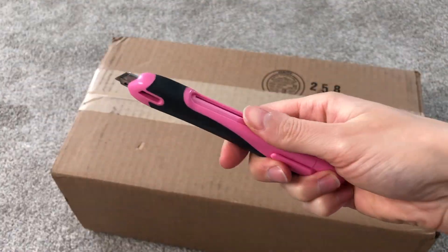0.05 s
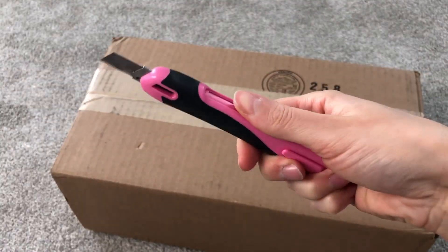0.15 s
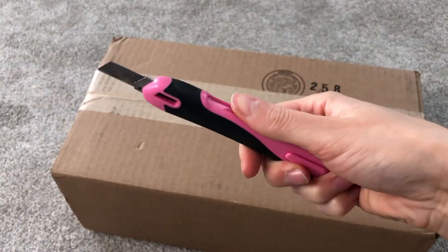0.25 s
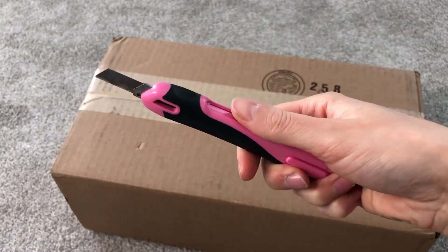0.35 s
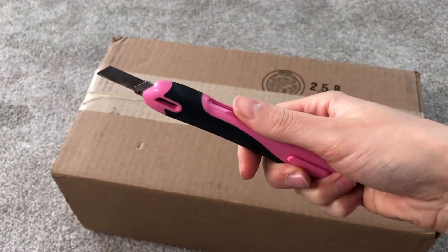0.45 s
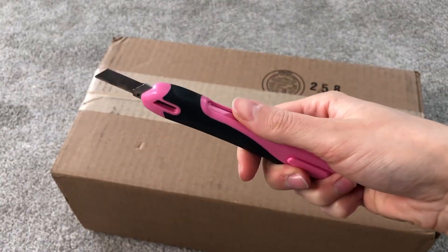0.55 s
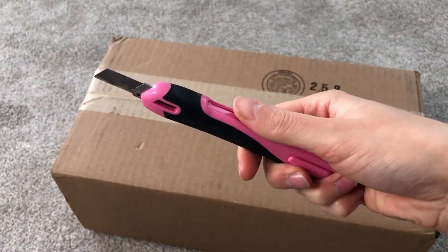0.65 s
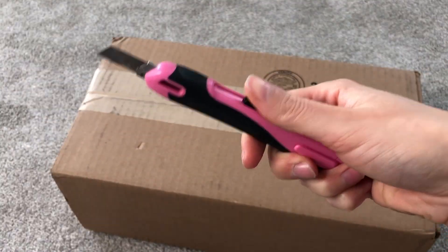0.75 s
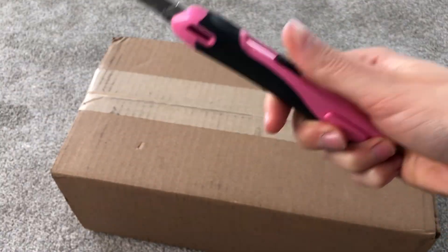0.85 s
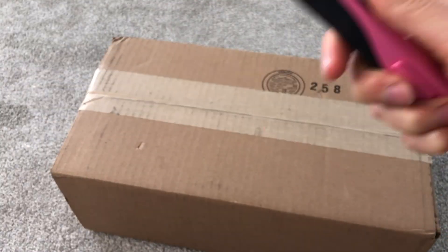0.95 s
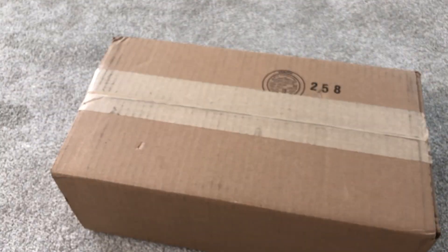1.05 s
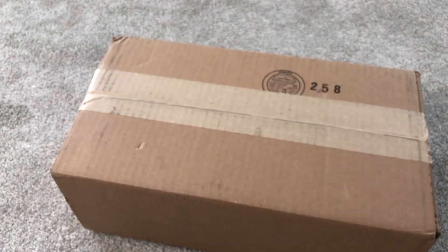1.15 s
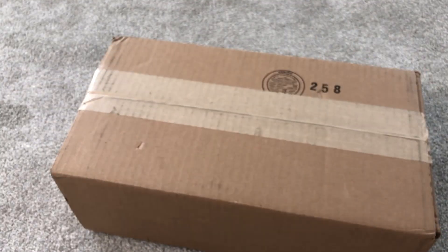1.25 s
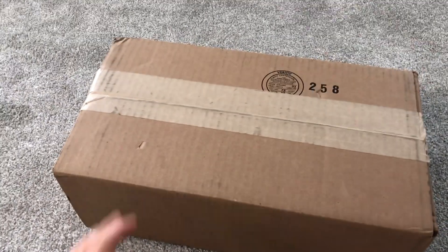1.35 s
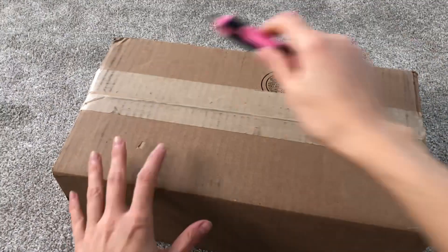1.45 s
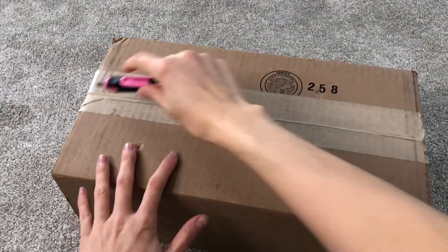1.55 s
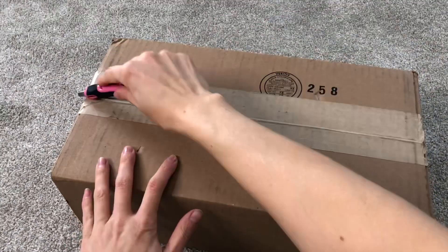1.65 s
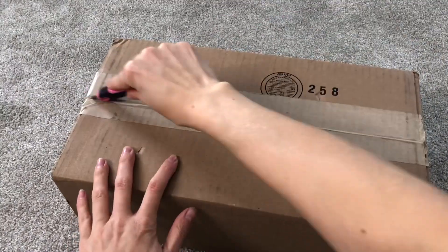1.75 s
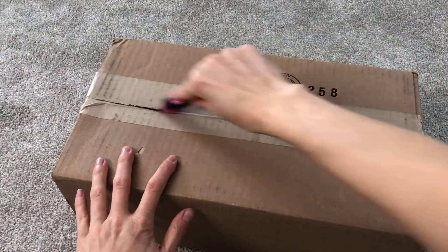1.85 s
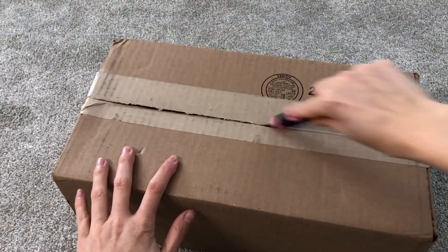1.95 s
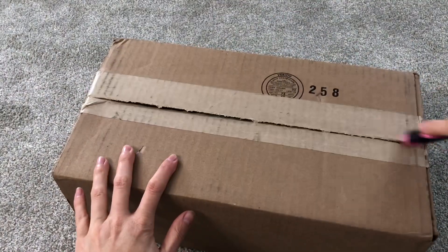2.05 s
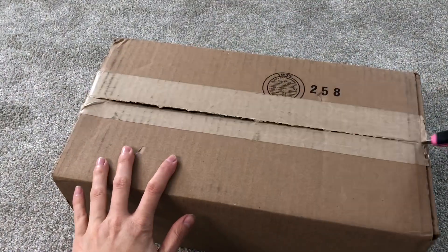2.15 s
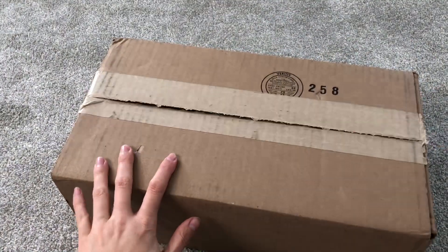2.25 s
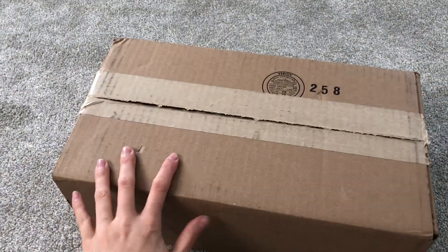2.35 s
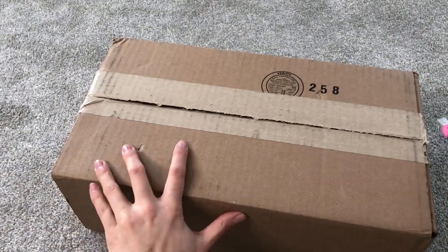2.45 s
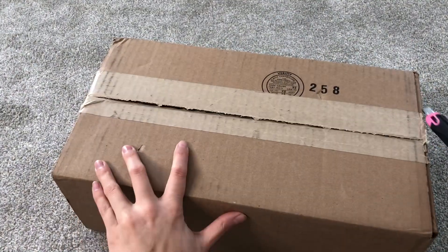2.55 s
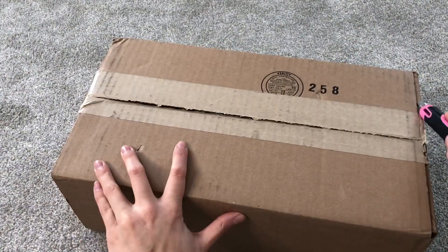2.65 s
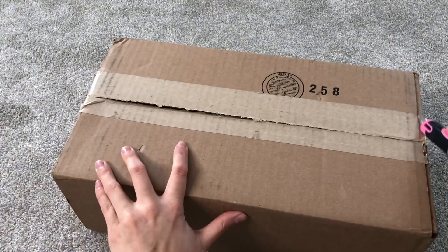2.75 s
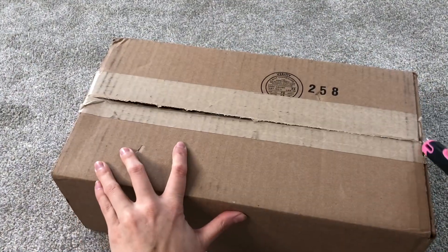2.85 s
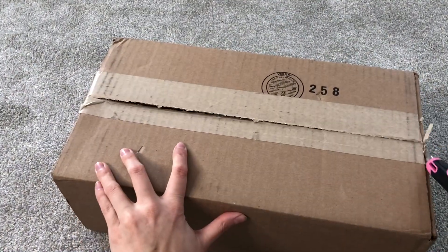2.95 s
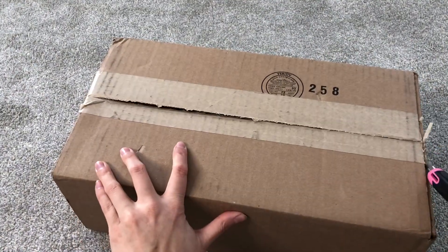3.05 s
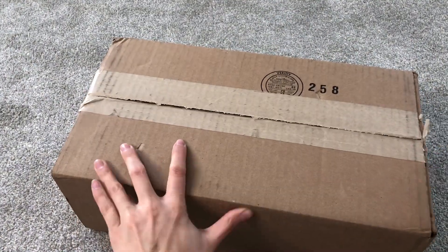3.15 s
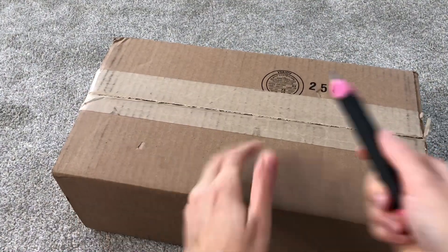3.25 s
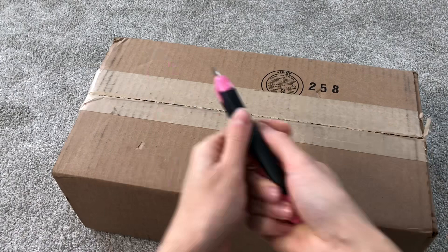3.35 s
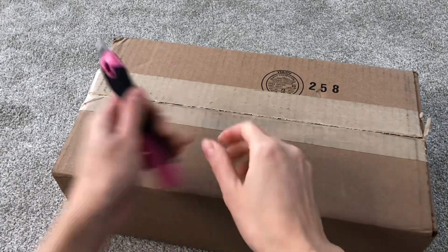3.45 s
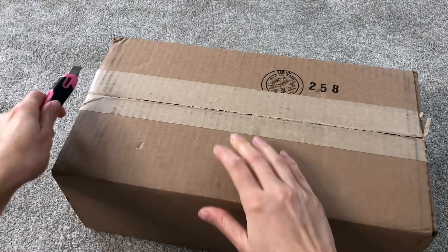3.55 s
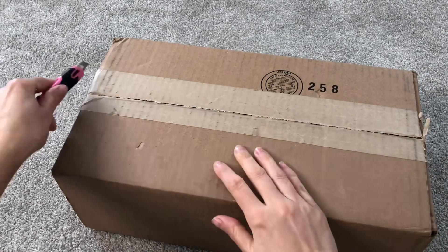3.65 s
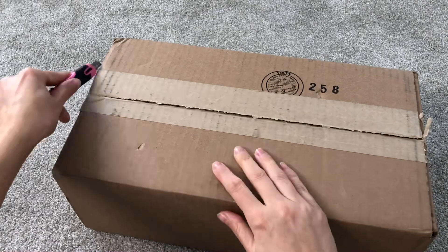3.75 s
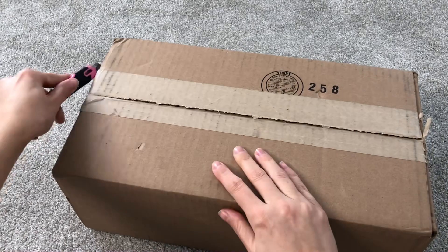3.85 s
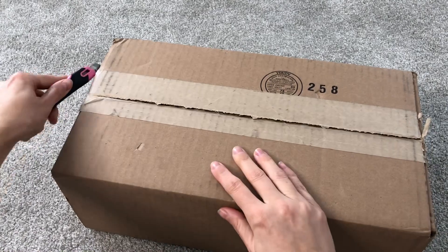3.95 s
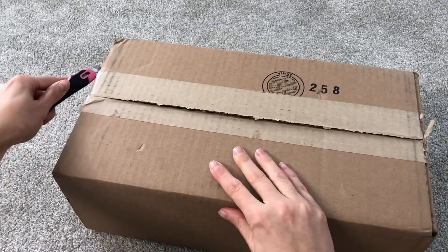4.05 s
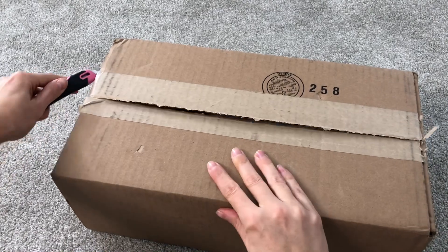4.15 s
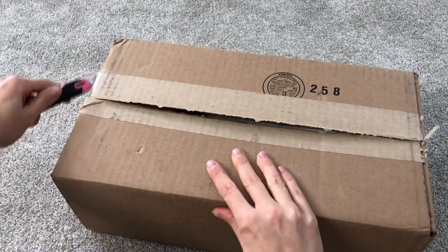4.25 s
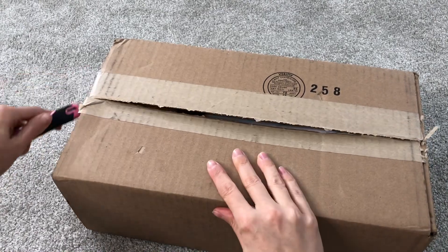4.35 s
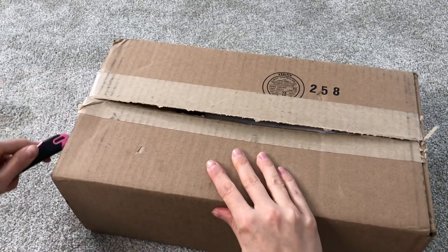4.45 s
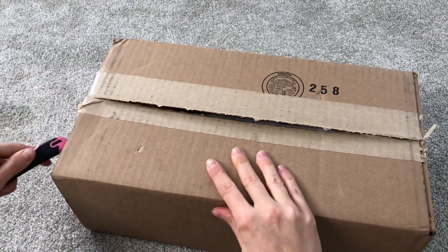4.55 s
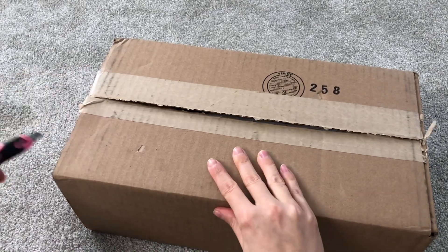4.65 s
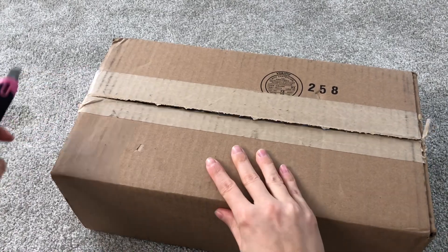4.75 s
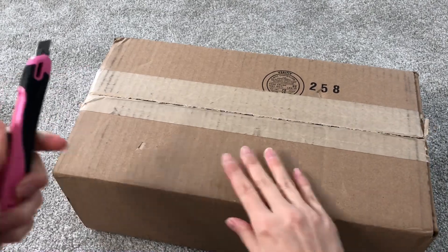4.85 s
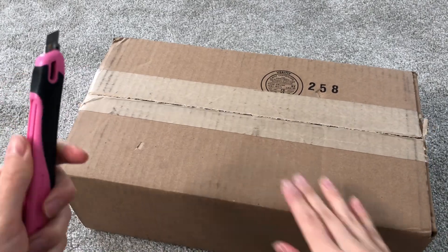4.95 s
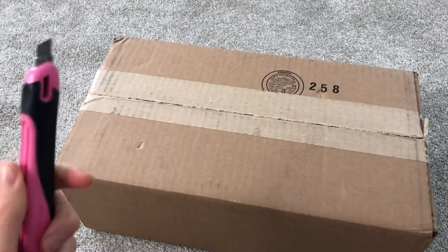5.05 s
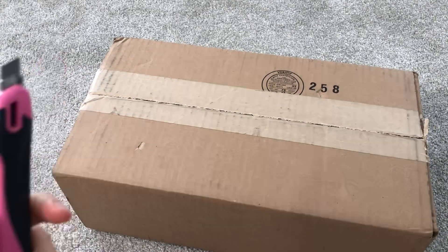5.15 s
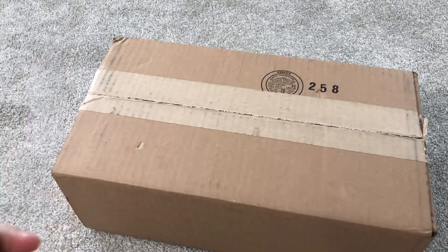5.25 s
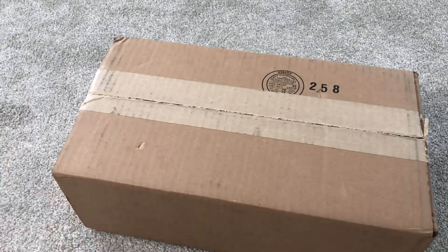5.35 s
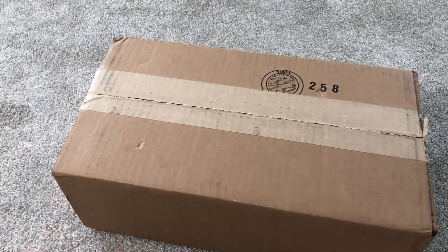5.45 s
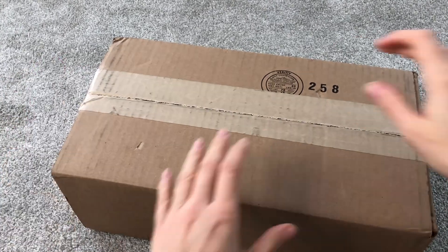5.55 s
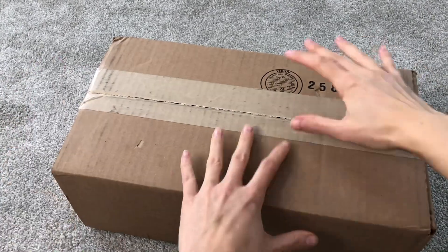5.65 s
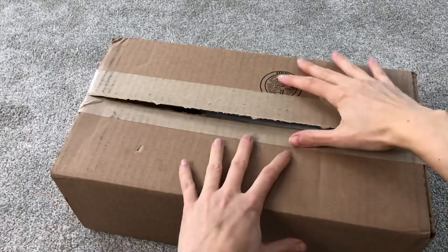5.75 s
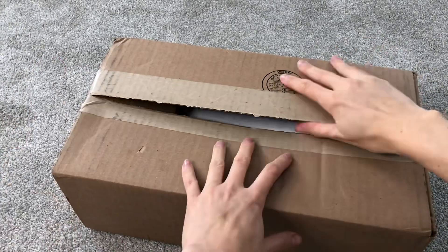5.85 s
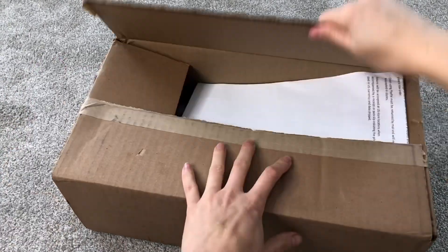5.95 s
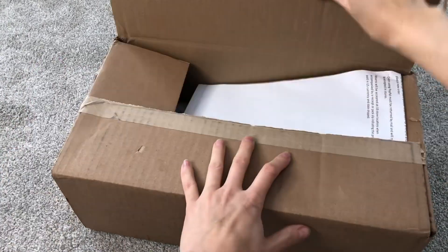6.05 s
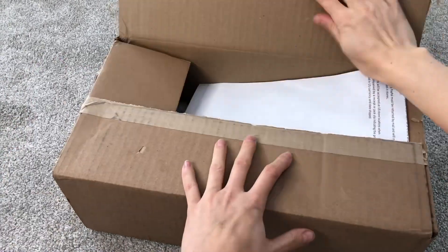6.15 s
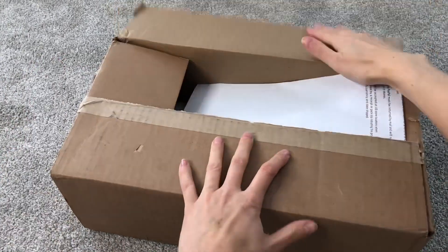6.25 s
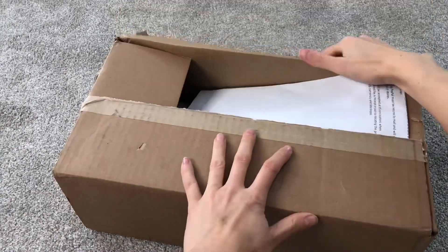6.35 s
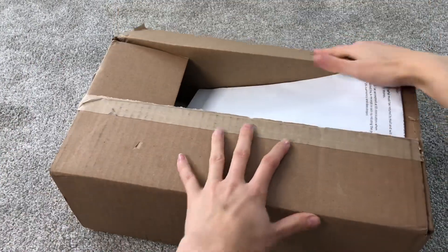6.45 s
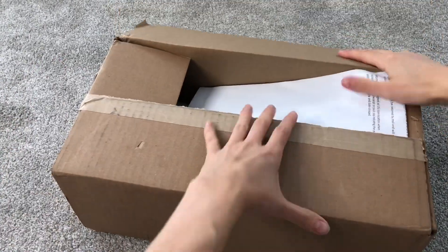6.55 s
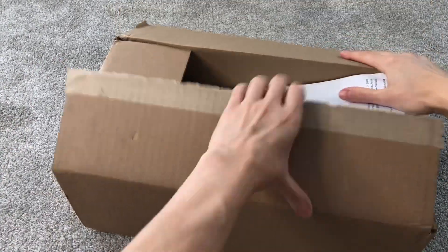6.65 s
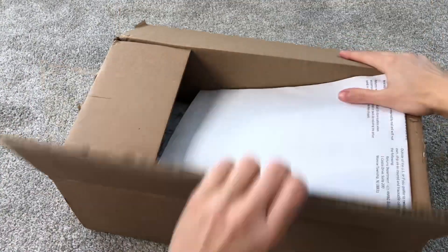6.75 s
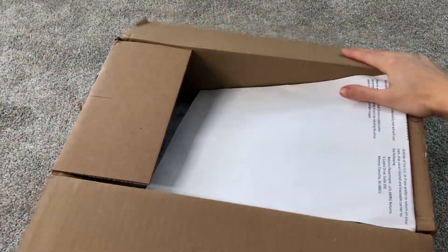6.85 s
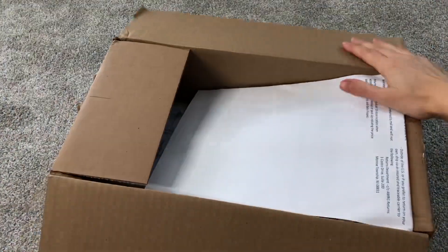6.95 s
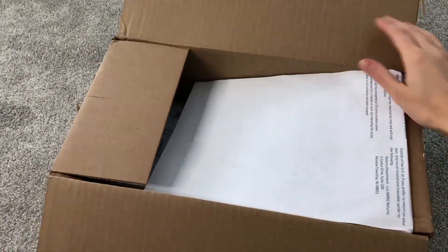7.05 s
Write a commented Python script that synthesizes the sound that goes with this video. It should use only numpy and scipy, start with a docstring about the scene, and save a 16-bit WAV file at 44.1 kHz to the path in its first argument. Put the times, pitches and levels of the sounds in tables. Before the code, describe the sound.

Close, dry sound in a quiet carpeted room with a faint steady hush. In the first 0.2 seconds a cutter's slider ratchets out in several crisp plastic clicks, then there is near silence. From about 1.4 the hand and blade touch cardboard faintly; at 1.8 to 2.15 a loud, gritty rip runs along the tape, stuttering with rapid hard catches that ring the hollow box, loudest near 1.95. Small ticks follow, with a short scratchy cut around 2.75 to 3.2. A softer, crackling, stick-slip cut comes at 4.0 to 4.6, followed by light rubs. At 5.25 to 5.46 the slider clicks back quickly, ending abruptly. Hands brush the carton from 5.7; a flap pops sharply at 5.95, thumps at 6.1 and scrapes as it folds. Another hollow knock lands at 6.68, then papery rubbing and small taps last until about 7.1.

```python
"""A cutter's blade is drawn three times through paper tape on a cardboard box, catching on the flutes: stick-slip
grit and sharp blows excite the decaying modes of the box and the hiss of tearing paper.
The cutter's slider clicks over its notches before and after, as noise bursts ringing plastic and handle; then
the flaps are popped and folded open, ringing the same cardboard modes as everything that touches the box.
The quiet carpeted room adds a short tail and a steady hush of filtered noise; the level dips briefly twice."""
import sys
import numpy as np
from scipy import signal
from scipy.fft import rfft, irfft
from scipy.io import wavfile

SR = 44100
rng = np.random.default_rng(int(sys.argv[2]) if len(sys.argv) > 2 else 0)


def gain_from_decibels(decibels):
    """Convert decibel values to linear amplitude factors."""
    exponent = np.asarray(decibels, float) / 20
    return 10 ** exponent


def store_wav(level_fs):
    """Save 16-bit WAV to argv[1]."""
    pcm = np.round(np.clip(np.atleast_2d(level_fs), -1, 1) * 32767)
    wavfile.write(sys.argv[1], SR, pcm.T.astype(np.int16))


N = 313551
T = np.arange(N) / SR  # s


def response(points):
    """Minimum-phase filter: folding the cepstrum makes the spectrum through (Hz, dB) points causal; unit energy."""
    hz, db = np.transpose(points)
    grid_hz = np.linspace(1, SR / 2, 1025)
    spectrum_db = np.interp(np.log(grid_hz), np.log(hz), db)
    cepstrum = irfft(np.log(gain_from_decibels(spectrum_db)))
    cepstrum[1:1024] *= 2
    cepstrum[1025:] = 0
    taps = irfft(np.exp(rfft(cepstrum)))[:1024]
    return taps / np.sqrt(np.sum(taps ** 2))


def modes(table, ring=1):
    """Modal superposition: exponentially decaying sines of alternate sign, t60 scaled by ring; unit energy."""
    t = T[:SR // 5]
    taps = np.zeros(len(t))
    for k, (hz, db, t60) in enumerate(table):
        decay = gain_from_decibels(db - 60 * t / t60 / ring)
        taps += decay * np.sin(2 * np.pi * hz * t) * (-1) ** k
    return taps / np.sqrt(np.sum(taps ** 2))


def through(x, taps):
    """Linear filtering: a signal convolved with an impulse response."""
    return signal.fftconvolve(x, taps)[:N]


def bursts(times, peak_db, bodies, rise_ms, fall_ms, steady=0):
    """Impact excitation: a short ragged push rings each body to its peak level; steady adds a one-way shove."""
    ms = 1000 * T[:SR // 20]
    shape = (1 - np.exp(-ms / rise_ms)) ** 2 * np.exp(-ms / fall_ms)
    pushes = shape * (steady + rng.standard_normal((len(times), len(ms))))
    out = np.zeros(2 * N)
    for s, gain, body, push in zip(times, gain_from_decibels(peak_db), bodies, pushes):
        sound = signal.fftconvolve(push, body)
        start = int(s * SR)
        out[start:start + len(sound)] += gain * sound / np.abs(sound).max()
    return out[:N]


# spectrum of the room's background: (frequency [Hz], relative level [dB per Hz])
ROOM_TONE = [(35, -63), (60, -17.5), (95, -16), (132, 3), (194, -11), (250, -4.5), (275, -9.5), (419, -11),
             (654, -11.5), (1200, -11), (1420, -13.5), (2320, -18), (15100, -24.5), (16200, -26.5)]


def hush():
    """Stationary background noise: white noise shaped by the room's spectrum."""
    rms_db = -68.5
    return gain_from_decibels(rms_db) * through(rng.standard_normal(N), response(ROOM_TONE))


# slider notches: (time [s], click reference level [dB], tock peak level [dB])
NOTCHES = [(0.0457, -53, -62.5), (0.0654, -28.5, -40), (0.118, -32, -44), (0.1563, -30.5, -40.5),
           (0.191, -31, -37.5), (5.25, -26, -38), (5.303, -25.5, -41.5), (5.35, -24, -37),
           (5.3927, -24.5, -40), (5.4269, -23, -42.5), (5.4585, -26, -44)]
# spectrum of the plastic snap: (frequency [Hz], relative level [dB per Hz])
CLICK = [(1530, -75), (2600, 0.5), (2960, -11.5), (3470, -1.5), (5110, 2.5), (6470, -0.5), (7480, 1.5),
         (8200, -3), (14700, -4.5), (16000, -72)]
# handle modes while pushed out: (frequency [Hz], relative level [dB], t60 [s])
HANDLE = [(3800, -7, .008), (4300, -3, .008), (4750, 0, .011), (5200, -4, .008), (6900, -14, .005)]
# tock modes while drawn back: (frequency [Hz], relative level [dB], t60 [s])
SLIDER = [(1480, -8, 0.014), (1820, 4, 0.0029), (2190, 0.5, 0.011)]
PULLED_PITCH = 1.09  # drawn back, the grip stiffens the handle: pitch ratio
PUSHED_TOCK = 0.87  # pushed out, the tock sits lower: pitch ratio


def slider():
    """Detent release: the pawl creeps up, snaps and tocks, then the loose blade rattles in the handle."""
    s, click_db, tock_db = np.transpose(NOTCHES)
    pushed_out = s < 1
    plastic = [response(CLICK)] * len(s)
    handle_out = modes(HANDLE)
    handle_back = modes(np.array(HANDLE) * [PULLED_PITCH, 1, 1])
    handle = [handle_out if pushed else handle_back for pushed in pushed_out]
    tock_out = modes(np.array(SLIDER) * [PUSHED_TOCK, 1, 1])
    tock_back = modes(SLIDER)
    tock_body = [tock_out if pushed else tock_back for pushed in pushed_out]
    # the pawl climbs before it lets go
    creep = bursts(s - 0.006, click_db - 23, handle, rise_ms=2.1, fall_ms=3.6)
    snap = bursts(s - 0.0012, click_db - 3, plastic, rise_ms=1.3, fall_ms=0.46)
    ping = bursts(s - 0.0012, click_db - 1.5, handle, rise_ms=0.99, fall_ms=0.24)
    tock = bursts(s - 0.0012, tock_db, tock_body, rise_ms=0.37, fall_ms=0.16)
    rattle = bursts(s + 0.0063, click_db - 15.5, handle, rise_ms=0.39, fall_ms=13)
    plastic_tail = bursts(s, click_db - 16.5, plastic, rise_ms=0.78, fall_ms=12)
    return creep + snap + ping + tock + rattle + plastic_tail


def room(x, delay_ms=9.7, t60=0.12, wet_db=-16):
    """Diffuse reverberation: soft furnishings leave a faint, short noise tail after the first wall answers."""
    t = T[:SR // 3]
    decay = gain_from_decibels(-60 * t / t60)
    tail = rng.standard_normal(len(t)) * decay * (1000 * t > delay_ms)
    return x + gain_from_decibels(wet_db) * through(x, tail / np.sqrt(np.sum(tail ** 2)))


# long seam, right end, left end, far flap lifted, far flap folded, near flap:
# (start time [s], edge ring change [dB], rasp change [dB])
PLACES = [(0, 0.5, 3), (2.3, 0.5, -0.5), (3.3, -1, 1), (5.6, -1.5, 0.5), (6.06, -0.5, -0.5),
          (6.58, -4.5, -3)]


def place(s):
    """Position-dependent modal coupling: edge ring and rasp dB of the part being worked at time s."""
    start, edge_db, rasp_db = np.transpose(PLACES)
    k = np.searchsorted(start, s, side="right") - 1
    return edge_db[k], rasp_db[k]


# blade or hand dragging over cardboard: (start time [s], length [s], reference level [dB],
# weight into the broad panels [dB], bite into the paper [dB])
STROKES = [(1.396, 0.18, -77.5, 0, 13.5), (1.553, 0.055, -58, -1.5, -16), (1.673, 0.032, -58.5, -4, -3.5),
           (1.732, .05, -55, -6, 0), (1.786, 0.21, -33.5, -7.5, -15), (1.967, .165, -35.5, -1, -13),
           (2.123, 0.036, -51.5, -8, -11), (2.176, 0.063, -47.5, 0.5, -8.5), (2.342, 0.029, -57.5, 1, -8),
           (2.412, .08, -57, -1, -12), (2.514, 0.017, -69, 6.5, -8), (2.584, 0.02, -61.5, -6, -6),
           (2.633, 0.015, -56.5, 4, -9), (2.68, 0.013, -64, 5.5, 0), (2.745, 0.12, -41.5, -1, -12.5),
           (2.891, 0.083, -43.5, 0.5, -12.5), (2.988, 0.09, -52.5, 2.5, -7), (3.12, 0.098, -52, -4, -7),
           (3.4, .18, -78.5, 1.5, -3), (3.63, 0.039, -65.5, -2, -7.5), (3.718, .035, -70.5, -1.5, -6),
           (3.793, 0.069, -66.5, -4.5, -6), (3.88, .04, -73, -6, 4), (3.924, .11, -61.5, 5, -8),
           (4.059, 0.13, -55, 0, -9), (4.135, 0.19, -52, -4, 1.5), (4.279, 0.24, -42, 3.5, -9),
           (4.572, 0.088, -54, -6, -6), (4.705, .165, -58, 0, -7.5), (5.7, 0.074, -59.5, -9.5, -2),
           (5.756, 0.15, -53.5, -3.5, -0.5), (5.918, 0.053, -48.5, -5, -2), (5.957, 0.095, -56, -5, -0.5),
           (6.071, 0.022, -55, 3.5, -5), (6.11, 0.036, -52, -14, -12), (6.151, 0.044, -47, -29, -5.5),
           (6.213, 0.2, -48, -4, -11.5), (6.418, 0.16, -56, -1.5, -3.5), (6.578, 0.11, -54, -7, -4.5),
           (6.64, .12, -42, -9.5, -9.5), (6.805, 0.073, -50.5, -1.5, -6.5), (6.892, 0.029, -54.5, -5, -7),
           (6.937, 0.035, -52.5, -3.5, -3.5), (6.996, 0.092, -51.5, -9.5, -9)]
LAND_DB_PER_S, LIFT_DB_PER_S = 896.5, 597  # how fast a stroke comes in and dies away
ARCH_DB = 5  # pressure is lighter at both ends than mid-stroke
STROKE_EDGE_DB = -6
EDGE_PER_WEIGHT = -0.26  # strokes that load the panels less run nearer the edges: dB per dB
STICK_DB, STICK_S = -6, 0.0063  # before each catch the blade sticks and the rubbing fades
SLIP_DB, SLIP_S = 2, 0.0096  # once it lets go the rubbing surges


def pressure():
    """Incoherent power addition: strokes land, arch and lift on lid, edges, panels and paper, with stick-slip."""
    power = np.zeros((4, N))
    for s, length, db, weight_db, bite_db in STROKES:
        along = np.clip((T - s) / length, 0, 1)
        arch_db = -ARCH_DB * (2 * along - 1) ** 2
        land_db = -LAND_DB_PER_S * np.maximum(s - T, 0)
        lift_db = -LIFT_DB_PER_S * np.maximum(T - s - length, 0)
        edge_db = STROKE_EDGE_DB + EDGE_PER_WEIGHT * weight_db + place(s)[0]
        part_db = np.array([[0], [edge_db], [weight_db], [bite_db]])
        power += gain_from_decibels(2 * (db + arch_db + land_db + lift_db)) * gain_from_decibels(2 * part_db)
    catch_db = np.zeros(N)
    for s, *_ in BLOWS:
        catch_db += np.interp(T, [s - STICK_S, s - 0.001, s, s + SLIP_S], [0, STICK_DB, SLIP_DB, 0])
    return np.sqrt(power) * gain_from_decibels(catch_db)


def grit(per_s, spread_db, patch_ms, patchy_db):
    """Stick-slip friction: slipping fibres give random ticks of uneven size, stronger in patches; rms 1."""
    size_db = np.minimum(spread_db * rng.exponential(size=N), 10)
    size = gain_from_decibels(size_db) * rng.standard_normal(N)
    ticks = size * (rng.random(N) < per_s / SR)
    smoothing = np.exp(-(1000 * T[:2000] / patch_ms - 3) ** 2)
    patch = through(rng.standard_normal(N), smoothing)
    ticks = ticks * gain_from_decibels(patchy_db * np.tanh(patch / patch.std()))
    return ticks / ticks.std()


# modes of the box, lowest group first, shared by drags and blows: (frequency [Hz], relative level [dB], t60 [s])
THUD = [(105.5, -9.5, 0.1), (133, 5.5, 0.05), (190, -4.5, 0.024)]
PANEL = [(247, 0.5, .08), (285.3, 1.5, 0.074), (360, 3.5, 0.0806), (420.8, 6, 0.053), (535, 1.5, 0.066),
         (619, 0.5, 0.098), (770, -4.5, 0.053)]
LID = [(984, -4.5, 0.033), (1118, -8.5, 0.079), (1298, 4, 0.032), (1373, -2, 0.045), (1400, -7, 0.081),
       (1624, -4, 0.026)]
EDGE = [(1778, -3, 0.032), (2020, -1.5, 0.046), (2198, -5.5, 0.058), (2430, -4, 0.026), (2724, -7, 0.027),
        (2825, -9, 0.029)]
# narrow rasp of the cut edge: (frequency [Hz], relative level [dB], t60 [s])
BLADE = [(3830, -8, .012), (4436, 0.5, 0.0083), (4700, -7, 0.025), (5058, 4, 0.0055)]
# spectrum of tearing paper: (frequency [Hz], relative level [dB per Hz])
TAPE = [(1650, -10.5), (2800, -8), (3220, -8.5), (4350, -4.5), (5040, -11.5), (6100, -21), (8680, -22),
        (11000, -17.5), (12500, -19), (15100, -14), (15700, -29.5), (16200, -37)]
RASP_PER_DB = 0.237  # the cut edge sings out faster than the rest as contact hardens: dB per dB


def drags():
    """Friction-driven resonance: stick-slip grit shakes the box, rasps and crackles from the torn edge."""
    lid, edge, panel, paper = pressure()
    slips = grit(per_s=4000, spread_db=2.5, patch_ms=3.09, patchy_db=4)
    fibres = grit(per_s=5000, spread_db=2.5, patch_ms=3.8, patchy_db=2.5)
    snags = grit(per_s=1300, spread_db=-1, patch_ms=8.7, patchy_db=1.5)
    lid_ring = through(lid * slips, modes(LID, 0.53))
    edge_ring = through(edge * (1.2 * slips + 0.29 * fibres), modes(EDGE, 0.44))
    panel_ring = through(panel * slips, modes(PANEL, 0.41))
    thud = gain_from_decibels(-14.5) * through(panel * fibres, modes(THUD))
    hardness = (lid / gain_from_decibels(-46)) ** RASP_PER_DB
    rasp_drive = paper * hardness * gain_from_decibels(place(T)[1]) * snags
    rasp = gain_from_decibels(-6.5) * through(rasp_drive, modes(BLADE))
    crackle = through(paper * (0.16 * slips + 0.48 * fibres), response(TAPE))
    return lid_ring + edge_ring + panel_ring + thud + rasp + crackle


# blade catches, tape snaps and fingertip taps: (time [s], lid peak level [dB],
# weight into the broad panels [dB], bite into the paper [dB])
BLOWS = [(1.5554, -37.5, -1.5, -14), (1.5947, -40, -12, -10), (1.6553, -46, -9, -4.5),
         (1.7679, -27, -11, -20), (1.7894, -26, 3.5, 0), (1.8274, -26.5, -1, -4.5),
         (1.8714, -15.5, -5, -15.5), (1.8913, -11.5, -10, -12), (1.9088, -11.5, -10.5, -22),
         (1.9197, -10.5, -4.5, -15), (1.9362, -7, -9.5, -19), (1.952, -7, -10, -24.5),
         (1.9669, -21, -17, -13), (1.98, -17, 0.5, -6), (1.996, -17.5, -1.5, -11.5),
         (2.0043, -17, 0.5, -11.5), (2.023, -26, 8, -3), (2.0348, -17, 0.5, -6.5), (2.0479, -19.5, 1, -10),
         (2.0611, -23, -29, -19), (2.0783, -18.5, -3.5, -12.5), (2.092, -20, -11, -11.5),
         (2.106, -25, 3.5, -7.5), (2.1935, -33.5, -8, -13), (2.2092, -23, -7.5, -41),
         (2.401, -35.5, -5.5, -16), (2.5866, -44, -3, -7), (2.7364, -36, -4, -8.5),
         (2.8438, -27.5, 2.5, -4.5), (2.9355, -31.5, -2, -13), (2.9641, -34.5, -2.5, -9),
         (3.0238, -34.5, 5.5, -3.5), (3.042, -21, -6, -15.5), (3.1925, -42, -4, -11),
         (3.9915, -56, 12.5, -18), (4.011, -62, -5, 6), (4.0468, -45.5, -4, -5), (4.161, -33.5, -3, -4),
         (4.2008, -52.5, 16.5, -8), (4.2737, -46, 9.5, 5.5), (4.2948, -21.5, -2, -14), (4.3129, -33, -8, 4),
         (4.3305, -28.5, 4.5, -4.5), (4.355, -31, 7, -3.5), (4.375, -33, 9.5, -2), (4.3976, -30, -20, -16),
         (4.4216, -34.5, 6.5, -5.5), (4.443, -36.5, 1, -2), (4.4586, -31.5, 8.5, -9),
         (4.4758, -32.5, 2, -8), (4.5099, -35, 5.5, -10), (4.6, -35, -25, -22), (4.721, -47, 1.5, -8),
         (4.8567, -42.5, -6, -11), (4.9083, -46, -25.5, -9.5), (5.701, -45.5, 0.5, -5),
         (5.8723, -43.5, -2.5, -0.5), (5.947, -30.5, 14, 5.5), (5.9506, -12, -8, -17),
         (5.9625, -18, -17, -23), (6.0983, -29.5, -28, -14), (6.117, -54, -17, 3), (6.1775, -40, -25, -4),
         (6.261, -38, -26, -16), (6.359, -36.5, -25, -11), (6.484, -44, -5, -18), (6.509, -42.5, 0, -21),
         (6.6178, -34, -18, 4), (6.682, -12.5, -5.5, -14), (6.738, -40.5, -15, -9.5),
         (6.7815, -39, 8.5, -10), (7.0465, -42, -3.5, -1), (7.0844, -44.5, -6, 9.5)]
# the whole box jolted by a hand, a flap or a hard catch: (time [s], thud peak level [dB])
THUMPS = [(1.5573, -42), (1.9196, -25), (1.953, -25), (1.9941, -24.5), (2.0626, -28), (2.2111, -35),
          (3.482, -44), (4.2019, -47), (4.2757, -42), (5.702, -45), (5.873, -52), (5.9496, -24),
          (6.0982, -22), (6.177, -51), (6.682, -29.5), (6.783, -38)]
TAPED_UNTIL_S = 5.5
TAPED_RING = 0.48  # flaps still pressed down ring shorter: share of t60
EDGE_DB, EDGE_PER_BITE = 1.5, 0.31  # a harder bite also rings the stiff edges more: dB, dB per dB
THUD_UNDER_PANEL_DB, THUMP_PANEL_DB = -25, -18.5


def box_bodies(table, times):
    """Boundary damping: modes are damped while taped down, free once opened."""
    taped, free = modes(table, TAPED_RING), modes(table)
    return [taped if s < TAPED_UNTIL_S else free for s in times]


def blows():
    """Modal impact response: sharp contact reaches the stiff edges at once, broad panels take longer to swing."""
    s, lid_db, weight_db, bite_db = np.transpose(BLOWS)
    place_edge_db, place_rasp_db = place(s)
    edge_db = lid_db + EDGE_DB + EDGE_PER_BITE * bite_db + place_edge_db
    panel_db = lid_db + weight_db
    crack_db = lid_db + bite_db
    rasp_db = crack_db - 9.5 + place_rasp_db + RASP_PER_DB * (lid_db + 29.5)
    # blows and jolts both move the panels and the whole box
    jolt_s, jolt_db = np.transpose(THUMPS)
    low_s = np.r_[s, jolt_s]
    low_panel_db = np.r_[panel_db, jolt_db + THUMP_PANEL_DB]
    thud_db = np.r_[panel_db + THUD_UNDER_PANEL_DB, jolt_db]
    lid = bursts(s - 0.0015, lid_db, box_bodies(LID, s), rise_ms=1, fall_ms=1.7)
    edge = bursts(s - 0.0015, edge_db, box_bodies(EDGE, s), rise_ms=0.19, fall_ms=1)
    panel = bursts(low_s - 0.001, low_panel_db, box_bodies(PANEL, low_s), rise_ms=1.6, fall_ms=1.6)
    thud = bursts(low_s, thud_db, box_bodies(THUD, low_s), rise_ms=0.47, fall_ms=0.65, steady=0.71)
    paper = [response(TAPE)] * len(s)
    blade = [modes(BLADE[:3])] * len(s)
    crack = bursts(s - 0.0012, crack_db + 0.5, paper, rise_ms=1, fall_ms=1)
    rasp = bursts(s - 0.0008, rasp_db, blade, rise_ms=0.82, fall_ms=0.95)
    shreds = bursts(s, crack_db - 8, paper, rise_ms=3, fall_ms=17)
    return lid + edge + panel + thud + crack + rasp + shreds


# brief level dips: (time [s], fade out [s], fade in [s], depth [dB])
DIPS = [(1.363, 0.027, 0.014, -22), (5.482, 0.0018, 0.034, -28)]


def scene():
    """Superposition: cutter and box in the room over its hush; the last dip also chops the slider's tail."""
    near = room(slider() + drags() + blows())
    chop_s, _, back_s, _ = DIPS[-1]
    audible = (T < chop_s) | (T > chop_s + 2 * back_s)
    return (near * audible + hush())[None]


def low_pass(x):
    """Removes everything above the highest recorded frequency."""
    return signal.sosfilt(signal.butter(12, 16800, fs=SR, output="sos"), x)


def record(dry):
    """High-pass filtering and gain modulation: the microphone drops the deep bass and the level dips briefly."""
    low_cut_hz = 139
    low_cut = signal.butter(3, low_cut_hz, "high", fs=SR, output="sos")
    heard = signal.sosfilt(low_cut, dry)
    dip_db = np.zeros(N)
    for s, fade_out, fade_in, depth_db in DIPS:
        dip_db += np.interp(T, [s - fade_out, s, s + fade_in], [0, depth_db, 0])
    mix = heard * gain_from_decibels(dip_db)
    return low_pass(mix)


dry = scene()
out = record(dry)
store_wav(out)
```